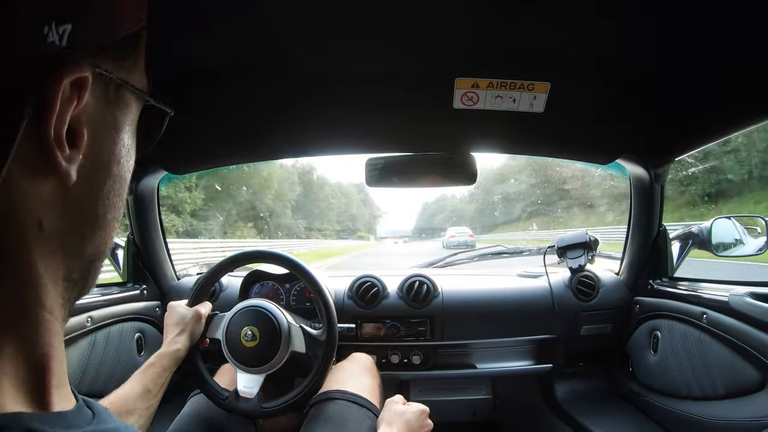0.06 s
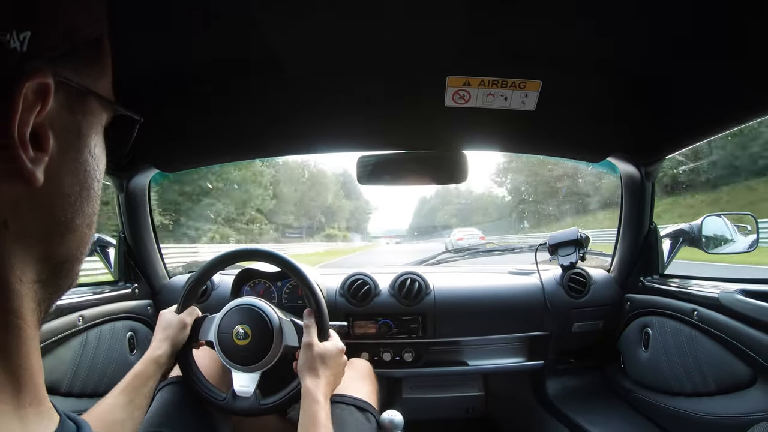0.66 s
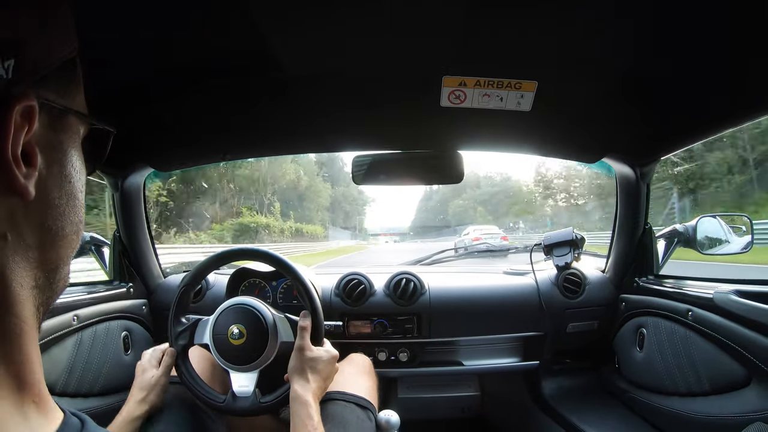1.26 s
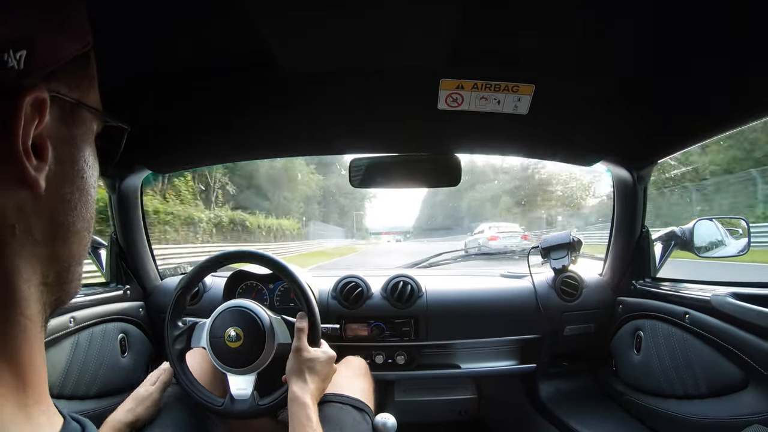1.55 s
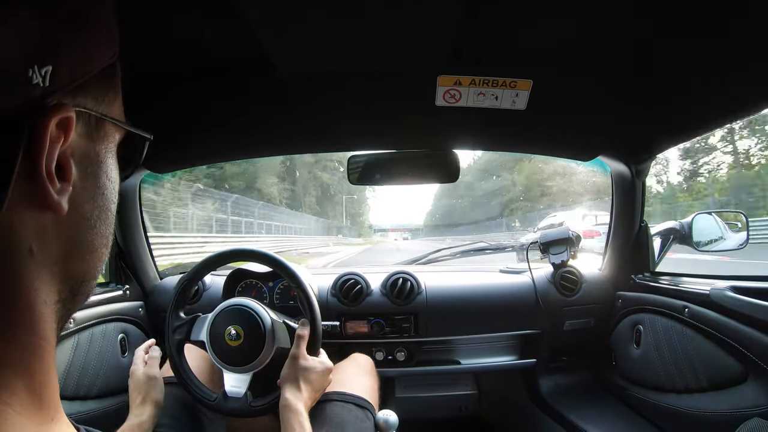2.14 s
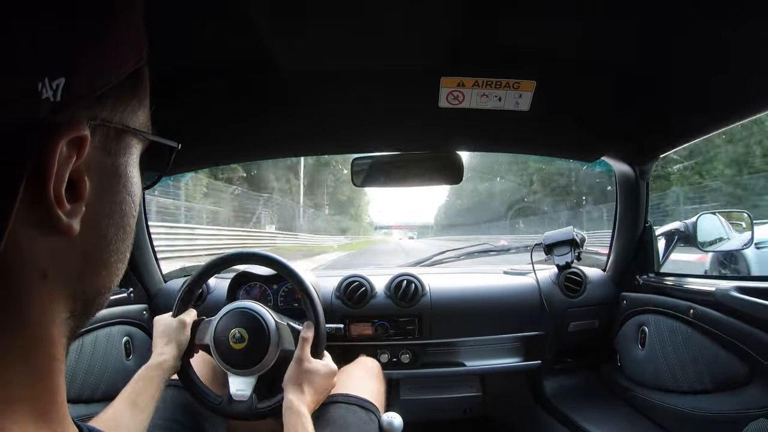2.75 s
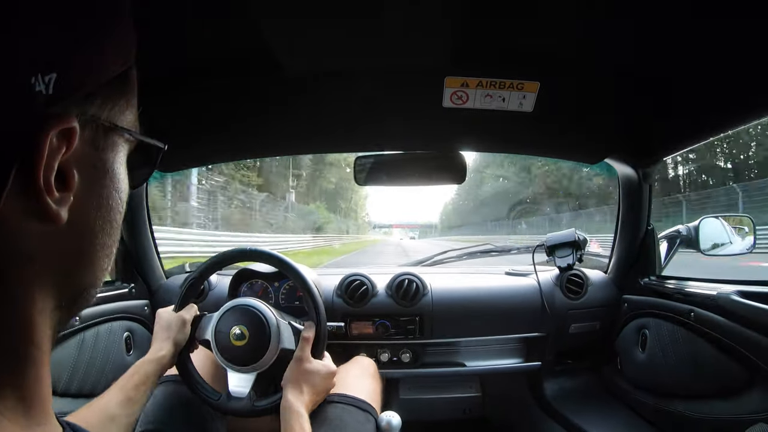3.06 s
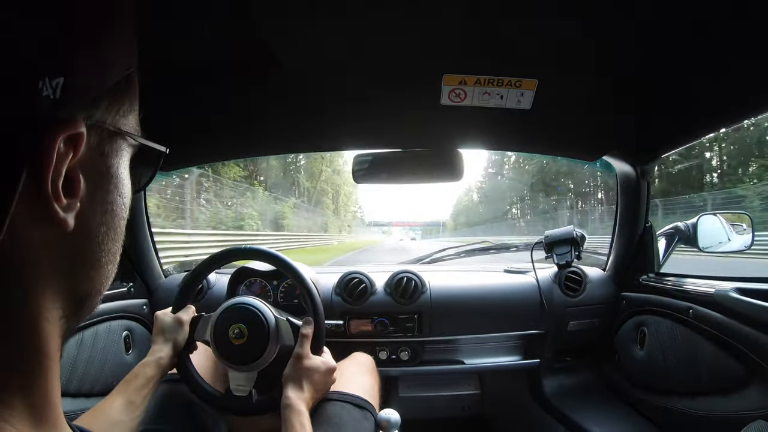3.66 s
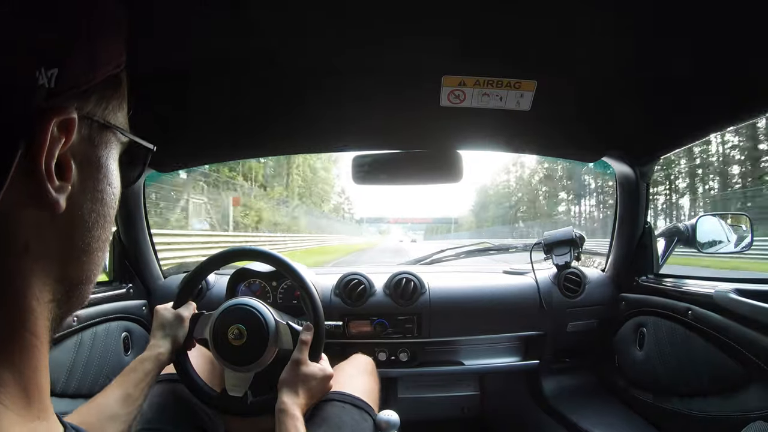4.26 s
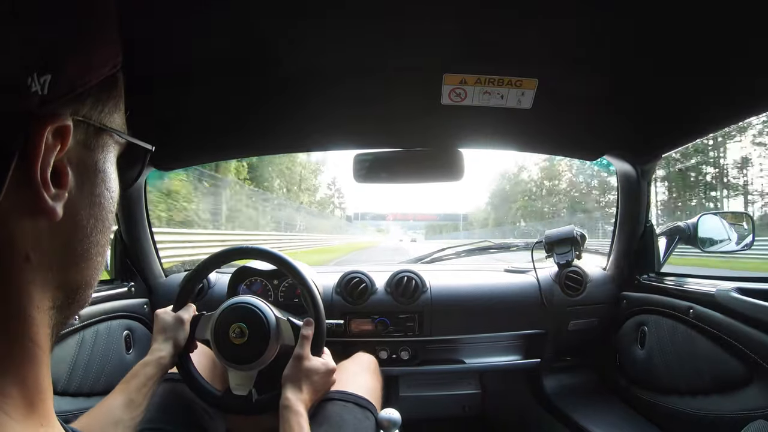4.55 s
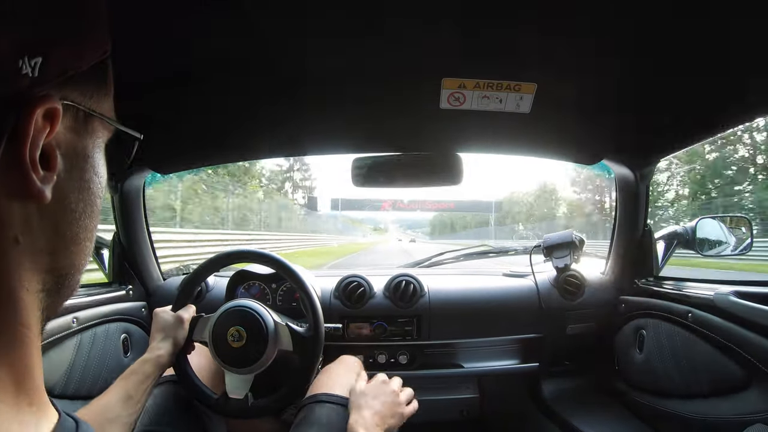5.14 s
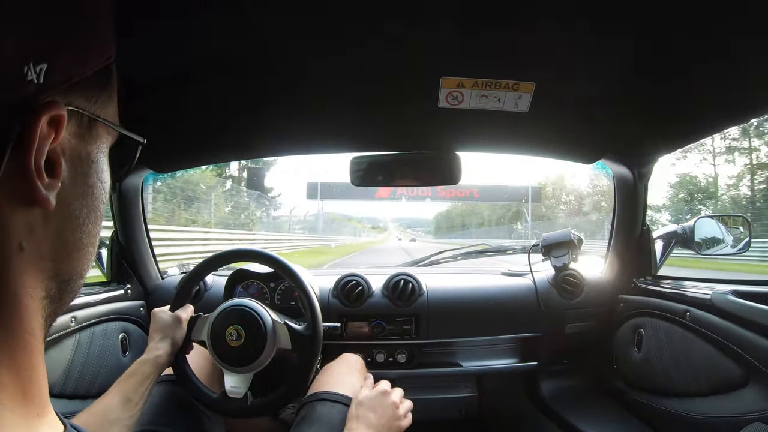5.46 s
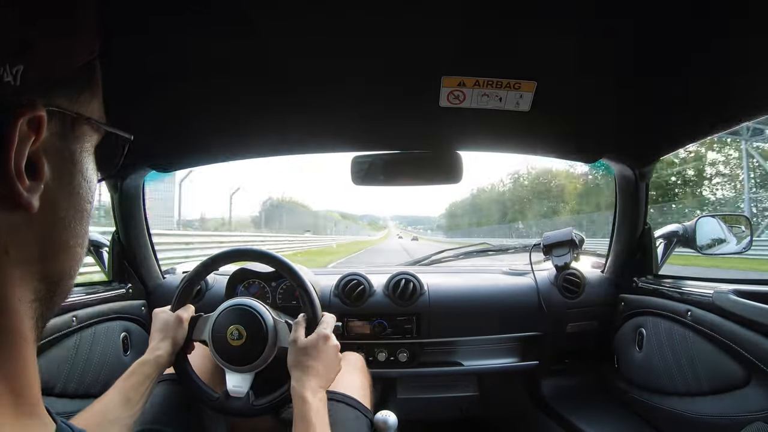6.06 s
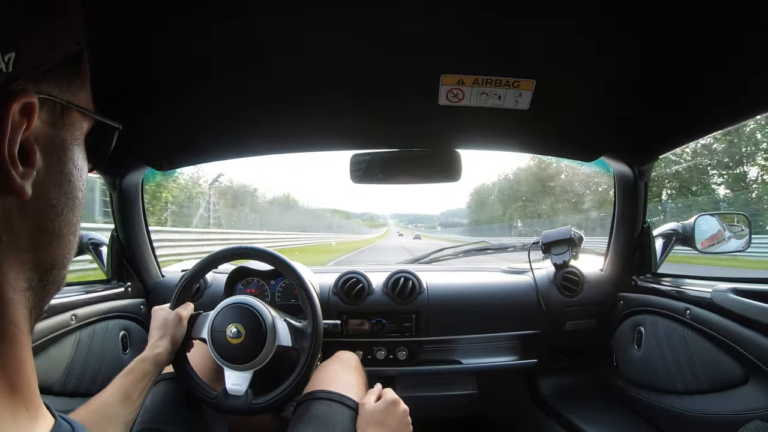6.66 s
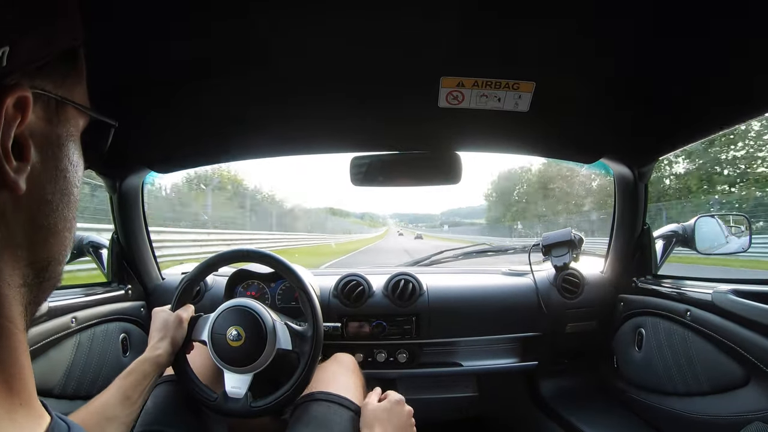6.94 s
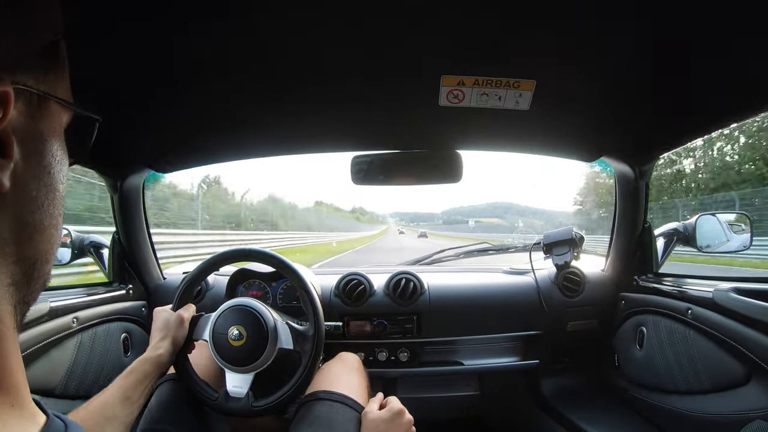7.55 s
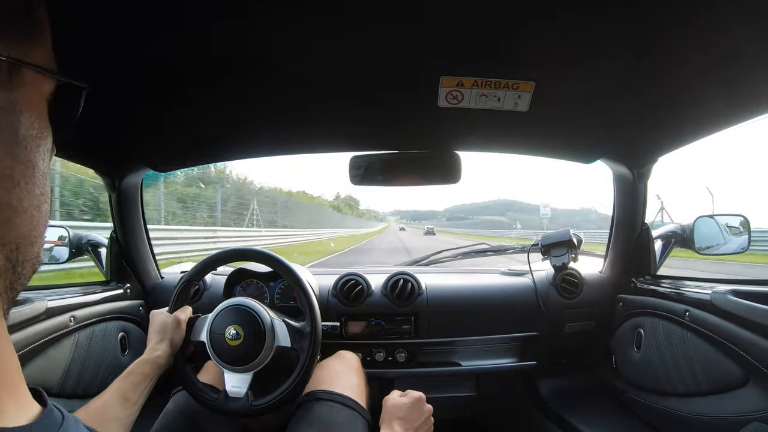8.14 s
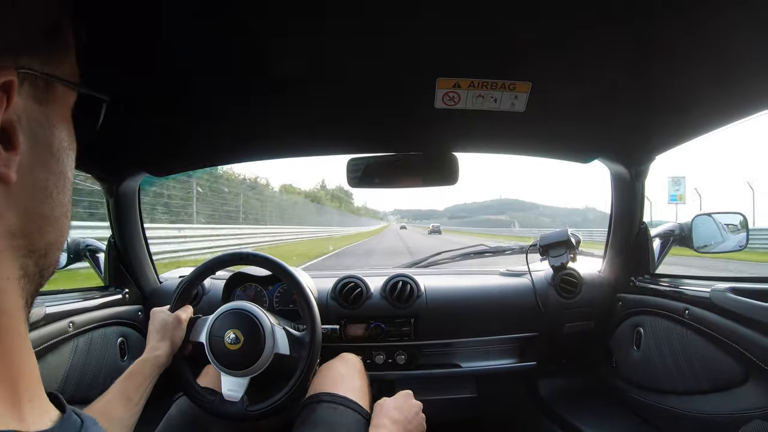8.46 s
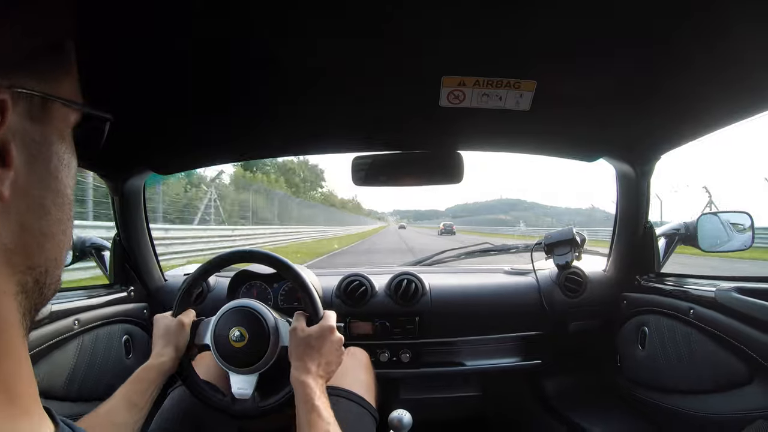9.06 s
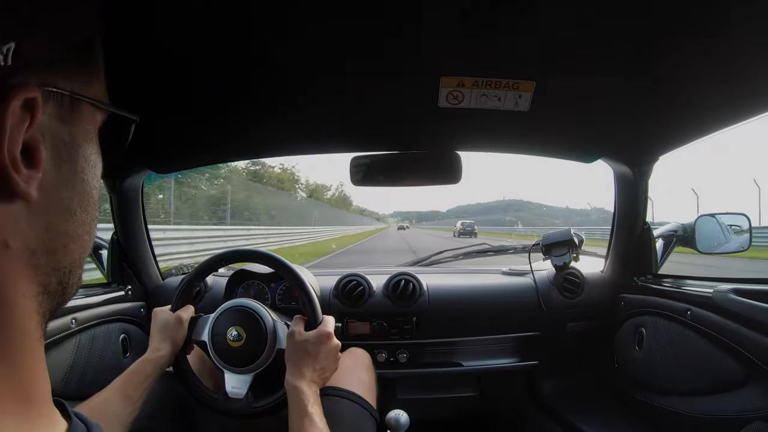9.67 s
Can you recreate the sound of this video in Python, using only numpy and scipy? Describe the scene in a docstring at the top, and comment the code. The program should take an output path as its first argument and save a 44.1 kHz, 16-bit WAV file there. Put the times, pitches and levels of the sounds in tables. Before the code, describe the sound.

Inside a fast car, an upshift leads into a long, droning acceleration and a lift off the throttle, with road rumble and wind hiss.

```python
"""A six-cylinder sports car at speed on a race track, heard from inside its small, bare cabin.
First comes a shift up a gear, with a short blare and a rush of air. The engine note drops into a boom,
then climbs for about seven seconds. Near the end the driver lifts off the throttle and the gears sing
softly. All along, wind hisses on the glass, tyres roar and the body rumbles, with a thud at each bump.
A limiter holds down the loudest bass peaks."""
import sys
import numpy as np
from scipy import signal
from scipy.fft import rfft, irfft, next_fast_len
from scipy.io import wavfile
from scipy.ndimage import uniform_filter1d, minimum_filter1d

SR = 44100
rng = np.random.default_rng(int(sys.argv[2]) if len(sys.argv) > 2 else 0)


def generate_wav(sig):
    """Save sig (samples, or channels by samples) to the path in sys.argv[1] as 16-bit PCM at SR."""
    pcm = np.round(np.clip(np.atleast_2d(sig).T, -1, 1) * 32767).astype(np.int16)
    wavfile.write(sys.argv[1], SR, pcm)


N = 432621
TIME = np.arange(N) / SR
CYLINDERS = 6  # each fires once per engine cycle; a "multiple" is a tone at so many times the cycle rate
LIFT_S = 7.82  # when the foot comes off the throttle

# wind on the glass and seals: (frequency [Hz], relative level [dB])
WIND_SPECTRUM = [(500, -4), (1100, -1), (1280, -0.5), (1550, 2.5), (1720, -5), (2050, -4), (2600, -9.5),
                 (3300, -10.5), (4200, -19), (5200, -23.5), (5900, -31.5), (8200, -36), (8700, -50),
                 (9600, -40.5), (15000, -56)]
# how loud the wind is: (time [s], level [dB])
WIND_LEVEL = [(0, -31), (.3, -43), (1.5, -41.5), (2.5, -41), (4, -37), (5.5, -37), (7.7, -36.5), (8.1, -37),
              (9, -39.5), (9.4, -39), (9.81, -44)]
# roar of the tyres: (frequency [Hz], relative level [dB])
TYRE_SPECTRUM = [(120, -5.5), (165, 0.5), (220, 0.5), (280, -1.5), (320, -5.5), (375, -2.5), (470, -11),
                 (660, -13.5), (800, -19.5), (1140, -20), (1270, -39)]
# how loud the tyres are: (time [s], level [dB])
TYRE_LEVEL = [(0, -17), (.22, -14.5), (.3, -21), (1.2, -22.5), (2, -21), (3.1, -21.5), (3.8, -19.5),
              (4.5, -18), (5.3, -18), (6, -19), (7, -19), (7.7, -18), (8.5, -18.5), (9.3, -18),
              (9.81, -21.5)]
# shaking of the car's body: (frequency [Hz], relative level [dB])
RUMBLE_SPECTRUM = [(12, -11.5), (28, 0.5), (50, -0.5), (72, -2.5), (110, 0.5), (135, -3)]
# how loud that shaking is: (time [s], level [dB])
RUMBLE_LEVEL = [(0, -12.5), (.5, -16), (1.3, -15.5), (2, -16.5), (3.7, -17), (4.9, -15.5), (5.9, -18.5),
                (7.2, -17), (8.3, -18.5), (9.1, -17.5), (9.81, -22)]
# low drone of the cabin air: (time [s], level [dB])
DRONE_LEVEL = [(0, -18.5), (.5, -19.5), (1.3, -20), (2, -20), (3.3, -25), (4.1, -21.5), (4.7, -24),
               (5.8, -18.5), (6.8, -20.5), (7.4, -22), (8, -21.5), (8.7, -24), (9.81, -22.5)]
# bumps in the track: (time of peak [s], relative level [dB], length [s])
BUMPS = [(0.252, -7.5, 0.18), (2.756, -8.5, 0.11), (3.078, -8, 0.13), (4.251, -10.5, 0.09),
         (6.844, -17, 0.21), (7.324, -13, 0.25), (7.625, -10, 0.1), (9.15, -12, .15)]
# gear tones off the throttle: (multiple, level [dB])
GEAR_TONES = [(17.7, -46), (20.7, -48), (26, -54)]
# resonances that let the thin whine through: (frequency [Hz], width [Hz], peak level [dB])
WHINE_RESONANCES = [(9550, 650, -87.5), (10150, 400, -91), (11000, 200, -80.5)]
# hiss of the intake and valves: (frequency [Hz], relative level [dB])
HISS_SPECTRUM = [(1400, 0.5), (2400, 5.5), (3500, -7.5), (5200, -11), (5900, -26), (8200, -27.5),
                 (8700, -37), (12000, -32)]
# air let out as the throttle shuts for the shift: (frequency [Hz], relative level [dB])
SHIFT_AIR_SPECTRUM = [(250, -14), (650, -1.5), (1000, -9), (1550, -5), (1900, -9), (2450, -7),
                      (3000, -12.5), (3700, -19), (5000, -24.5), (6200, -32), (8100, -37), (8700, -48),
                      (15000, -57)]
# how loud that air is: (time [s], level [dB])
SHIFT_AIR_LEVEL = [(0, -41), (.04, -38.5), (.09, -42), (.16, -37), (.2, -41.5), (.25, -41), (.275, -62),
                   (.4, -90)]
# exhaust tones while the clutch is down: (multiple, level [dB])
BLARE_TONES = [(10, -30.5), (12, -26.5)]
# the firing tone during the shift: (time [s], level [dB])
BLARE_FIRING_LEVEL = [(0, -18.5), (.08, -17), (.11, -30), (.21, -29), (.24, -23), (.27, -45), (.4, -90)]
# engine speed until the clutch bites: (time [s], cycle rate [Hz])
SHIFT_SPEED = [(0, 59.6), (.07, 61), (.21, 58), (.25, 49.5), (.32, 45.2), (.4, 46.31)]
# how loud the engine's rasp, hiss and weak tones are: (time [s], relative level [dB])
ENGINE_NOISE_LEVEL = [(0, -8), (.22, 2), (.29, -5.5), (.38, -4), (1.35, -4.5), (2.4, 0.5), (3.2, -1),
                      (4.3, 0.5), (5, 0), (7.8, 1), (7.93, -3.5), (8.6, -4.5), (9.81, -6.5)]
# engine cover and wall behind the seats: (frequency [Hz], width [Hz], relative level [dB])
PANEL_RESONANCES = [(578, 180, -0.5), (931, 100, 1.5), (1059, 65, 0.5), (1153, 20, 5), (1433, 110, 0),
                    (1560, 74, 1), (1908, 97, -2.5), (2050, 270, -7), (2900, 380, -21)]
# the engine's weaker tones: (multiple, relative level [dB])
WEAK_TONES = [(3, -31), (4, -31.5), (7, -40), (14, -51.5), (22, -51), (27, -56), (38, -61.5), (47, -61)]
# exhaust and body resonances, one multiple each: (multiple, frequency [Hz], width [Hz], peak level [dB])
EXHAUST_RESONANCES = [(4, 195, 20, -26.5), (4, 228, 30, -31.5), (5, 269.5, 8, -21), (5, 277, 7, -27),
                      (5, 290, 16, -33), (8, 392, 24, -33.5), (8, 474, 14, -38), (9, 476, 26, -32.5),
                      (9, 506, 18, -32.5), (9, 526, 10, -38), (10, 540, 16, -38.5), (10, 566, 12, -38),
                      (11, 580, 22, -37), (11, 612, 22, -36.5), (12, 545, 12, -30), (12, 590, 10, -32),
                      (12, 601, 18, -33.5), (12, 622, 16, -41), (12, 648, 14, -37.5), (12, 678, 20, -39),
                      (12, 713, 12, -36.5), (13, 685, 60, -45), (15, 715, 18, -43), (15, 753, 18, -43),
                      (16, 820, 22, -46.5), (16, 905, 30, -46), (16, 953, 18, -42.5), (17, 927, 22, -41.5),
                      (17, 960, 14, -45.5), (17, 1016, 8, -42), (18, 882, 44, -42.5), (18, 898, 16, -37.5),
                      (18, 962, 32, -45.5), (18, 1013, 18, -41.5), (18, 1073, 12, -44),
                      (19, 1015, 16, -45.5), (19, 1052, 18, -41), (20, 962, 20, -43), (20, 1040, 60, -43.5),
                      (20, 1112, 14, -41), (21, 1020, 70, -47.5), (21, 1125, 30, -45),
                      (21, 1150, 22, -39.3), (21, 1204, 10, -43.5), (24, 1154, 12, -44),
                      (24, 1418, 40, -45), (25, 1385, 50, -51), (25, 1485, 30, -51), (26, 1395, 18, -44),
                      (26, 1458, 22, -46), (30, 1510, 26, -48), (30, 1610, 120, -53),
                      (31.5, 1890, 16, -40.5), (33, 1862, 16, -49), (33, 1926, 22, -45.5),
                      (34, 1610, 30, -50), (34, 1950, 24, -50), (36, 1930, 48, -48), (36, 2066, 26, -43.3),
                      (36, 2112, 30, -52), (39, 2205, 40, -51), (40, 1885, 20, -52),
                      (41.6, 2210, 130, -53.5), (48, 2585, 50, -57), (48, 2720, 260, -62)]
# pitches at which the cabin air booms: (frequency [Hz], width [Hz], peak level [dB])
CABIN_RESONANCES = [(282, 30, -9.8), (304, 12, -22), (318.5, 5, -23), (349.5, 12, -20.5), (357, 5, -25)]


def amp(db):
    """Turns decibels into a gain to multiply by."""
    return 10 ** (np.asarray(db) / 20)


def unit_level(x):
    """Scales a signal so that its average power is 1."""
    return x / np.sqrt(np.mean(x ** 2) + 1e-20)


def curve(table):
    """Joins the points of a (time, value) table with straight lines."""
    return np.interp(TIME, *np.transpose(table))


def shaped_noise(spectrum):
    """Noise of power 1 that follows a spectrum table and fades beyond its ends."""
    size = next_fast_len(N)
    freqs = np.fft.rfftfreq(size, 1 / SR) + 0.09  # the offset avoids log(0)
    hz, db = np.transpose(spectrum)
    ends = np.minimum(freqs / hz[0], 1) ** 2 * np.minimum(hz[-1] / freqs, 1) ** 4
    gain = ends * amp(np.interp(np.log(freqs), np.log(hz), db))
    return unit_level(irfft(rfft(rng.standard_normal(N), size) * gain, size)[:N])


def wander(rate_hz, size=4096):
    """A random wobble of typical size 1, moving up to about the given rate."""
    freqs = np.fft.rfftfreq(size, N / SR / size)
    gain = (freqs > 0) / (1 + (freqs / rate_hz) ** 2)
    wobble = irfft(rfft(rng.standard_normal(size)) * gain)
    return np.interp(TIME, np.linspace(0, N / SR, size), unit_level(wobble))


def steadied(noise, share=.4, window_s=.045):
    """Smooths away a share of a noise's random swells, so that it sounds dense."""
    power = abs(uniform_filter1d(noise ** 2, round(window_s * SR))) + 1e-12
    return unit_level(noise / np.sqrt(power) ** share)


def ring(x, hz, width_hz):
    """A resonance: lets through only the sound near one pitch."""
    b, a = signal.iirpeak(hz, hz / (1.5 * width_hz), SR)
    return signal.lfilter(b, a, signal.lfilter(b, a, x))


def resonance_gain(hz, resonances):
    """How strong a tone gets as its pitch glides through flat-topped resonances."""
    powers = (amp(db) ** 2 / (1 + (2 * (hz - centre) / width) ** 4) for centre, width, db in resonances)
    return np.sqrt(sum(powers))


def uneven_tone(angle, multiple):
    """One engine tone; no two firings are alike, so its strength and timing shake."""
    strength = unit_level(amp(1.6 * wander(22) + 1.1 * wander(5)))
    phase = multiple * angle + 2 * np.pi * rng.random()
    return strength * np.sin(phase + .3 * wander(18))


def wind(gust_db=.2, flutter_db=1.04):
    """Air tears along the windows, with slow gusts and a quick flutter."""
    level_db = curve(WIND_LEVEL) + gust_db * wander(2)
    return shaped_noise(WIND_SPECTRUM) * amp(level_db + flutter_db * wander(25))


def tyre_roar():
    """The rolling tyres send a dense roar through the body."""
    return steadied(shaped_noise(TYRE_SPECTRUM)) * amp(curve(TYRE_LEVEL))


def body_rumble(drone_hz=110, drone_width_hz=28):
    """The shaking body rumbles and keeps the cabin air droning on one low note."""
    drone = steadied(ring(rng.standard_normal(N), drone_hz, drone_width_hz))
    shaking = steadied(shaped_noise(RUMBLE_SPECTRUM))
    return amp(curve(RUMBLE_LEVEL)) * shaking + amp(curve(DRONE_LEVEL)) * drone


def bumps(body_hz=32, gain_db=-5):
    """Each bump makes the body shudder a few times, never at quite the same pitch."""
    out = np.zeros(N)
    for peak_s, db, length_s in BUMPS:
        near = abs(TIME - peak_s) < 2 * length_s
        t = TIME[near] - peak_s
        hz = body_hz * 2 ** rng.uniform(-.25, .25)
        shudder = np.sin(2 * np.pi * (hz * t + rng.random()))
        swell = np.exp(-(2 * t / length_s) ** 2)
        out[near] += amp(gain_db + db) * swell * shudder
    return out


def engine_speed(pull_hz_per_s=2.3035, drag_hz_per_s2=.1208, coast_hz_per_s=1.07):
    """Engine cycles per second: a drop at the shift, a climb slowed by drag, then coasting down."""
    in_gear_s = SHIFT_SPEED[-1][0]
    pulling_s = np.clip(TIME, in_gear_s, LIFT_S) - in_gear_s
    coasting_s = np.maximum(TIME - LIFT_S, 0)
    climb_hz = pull_hz_per_s * pulling_s - drag_hz_per_s2 * pulling_s ** 2 / 2
    return curve(SHIFT_SPEED) + climb_hz - coast_hz_per_s * coasting_s


def cycle_angle(speed, tremble=.0009):
    """How far the engine has run, at 2 pi per cycle; its speed trembles slightly."""
    return 2 * np.pi * np.cumsum(speed * (1 + tremble * wander(12))) / SR


def throttle(open_at_s=.28, travel_s=.079, shut_db=-12.5, coast_db_per_s=-6):
    """Gain of the engine's tones: low for the shift, full in gear, dropping and fading after the lift."""
    coasting_s = np.maximum(TIME - LIFT_S, 0)
    shut_for_shift = np.clip((open_at_s - TIME) / travel_s, 0, 1)
    shut_for_lift = np.minimum(coasting_s / travel_s, 1)
    return amp(shut_db * (shut_for_shift + shut_for_lift) + coast_db_per_s * coasting_s)


def gear_whine(angle, rise_s=.5):
    """Off the throttle, the gears sing softly on the backs of their teeth."""
    fade_in = np.clip((TIME - LIFT_S) / rise_s, 0, 1)
    return np.sqrt(2) * fade_in * sum(amp(db) * uneven_tone(angle, k) for k, db in GEAR_TONES)


def thin_whine(angle, speed, multiple=184):
    """A thin, fuzzy whine, likely the supercharger, climbs with the revs and fades at the lift."""
    fuzz = 2.6 * wander(50)
    gain = resonance_gain(multiple * speed, WHINE_RESONANCES) * throttle()
    return np.sqrt(2) * gain * np.sin(multiple * angle + fuzz)


def intake_hiss(angle, noise_gain, level_db=-46):
    """Intake air and valves hiss in time with the firings."""
    pulsing = 1 + .25 * np.cos(CYLINDERS * angle)
    return amp(level_db) * noise_gain * shaped_noise(HISS_SPECTRUM) * pulsing


def shift_air(angle, flutter_db=1.2):
    """A rush of air from the intake, chopped by the cylinders, dies as the shift ends."""
    level_db = curve(SHIFT_AIR_LEVEL) + flutter_db * wander(40)
    chop = unit_level(1 + .6 * np.cos(CYLINDERS * angle))
    return shaped_noise(SHIFT_AIR_SPECTRUM) * chop * amp(level_db)


def shift_blare(angle, end_s=.24, fade_s=.043):
    """With the clutch down, the engine blares roughly and its note slides into the next gear."""
    fade = np.clip(np.minimum(TIME, end_s - TIME) / fade_s, 0, 1)
    rough_angle = angle + .06 * wander(45)
    firing = amp(curve(BLARE_FIRING_LEVEL)) * np.sin(CYLINDERS * rough_angle)
    blare = sum(amp(db) * uneven_tone(rough_angle, k) for k, db in BLARE_TONES)
    return np.sqrt(2) * (firing + fade * blare)


def panels(shaking, surge_db=1.8):
    """The panels behind the seats ring when shaken, each swelling and fading on its own."""
    return sum(amp(db + surge_db * wander(7)) * ring(shaking, hz, width)
               for hz, width, db in PANEL_RESONANCES)


def engine_rasp(angle, noise_gain, level_db=-35):
    """Each firing gives a puff of noise that rings the panels."""
    firing = 1 + .7 * np.cos(CYLINDERS * angle)
    banks = 1 + .21 * np.cos(3 * angle)  # the two rows of cylinders are not equally strong
    lope = 1 + .25 * np.cos(angle) + .25 * np.sin(2 * angle)  # unevenness over the cycle
    puffs = rng.standard_normal(N) * firing * banks * lope
    return amp(level_db) * noise_gain * unit_level(panels(puffs))


def weak_tones(angle, noise_gain, drift_db=1.8, panel_db=3):
    """Unequal cylinders leave weak tones between the strong ones; they flare where the panels ring."""
    strong = {CYLINDERS} | {row[0] for row in EXHAUST_RESONANCES}
    multiples, levels_db = np.transpose(WEAK_TONES)
    tones = np.zeros(N)
    for k in range(round(multiples[0]), round(multiples[-1]) + 1):
        if k not in strong:
            level_db = np.interp(k, multiples, levels_db) + drift_db * wander(1.2)
            tones += amp(level_db) * uneven_tone(angle, k)
    return np.sqrt(2 * throttle()) * noise_gain * (tones + amp(panel_db) * panels(tones))


def exhaust_tones(angle, speed, floor_db=-44, floor_db_per_octave=-6):
    """The strong tones swell as the revs carry them through their resonances, and stay faint between."""
    tones = np.zeros(N)
    for k in sorted({row[0] for row in EXHAUST_RESONANCES}):
        resonances = [row[1:] for row in EXHAUST_RESONANCES if row[0] == k]
        swell = resonance_gain(k * speed, resonances)
        floor = amp(floor_db + floor_db_per_octave * np.log2(k / CYLINDERS))
        tones += np.hypot(swell, floor) * uneven_tone(angle, k)
    return np.sqrt(2) * throttle() * tones


def cabin_boom(angle, speed, waver_db=.37):
    """The firing tone, one pulse per cylinder, booms as it passes the resonances of the cabin air."""
    gain = resonance_gain(CYLINDERS * speed, CABIN_RESONANCES) * throttle()
    waver = amp(-waver_db * wander(12))
    sway = .07 * wander(15)
    return np.sqrt(2) * gain * waver * np.sin(CYLINDERS * angle + sway)


def scene():
    """Engine, tyres, body and wind add up at one spot behind the seats."""
    speed, noise_gain = engine_speed(), amp(curve(ENGINE_NOISE_LEVEL))
    angle = cycle_angle(speed)
    engine = cabin_boom(angle, speed) + exhaust_tones(angle, speed) + weak_tones(angle, noise_gain)
    engine += gear_whine(angle) + engine_rasp(angle, noise_gain)
    engine += intake_hiss(angle, noise_gain) + thin_whine(angle, speed)
    shift = shift_blare(angle) + shift_air(angle)
    return (engine + shift + tyre_roar() + body_rumble() + wind() + bumps())[None]


def record(dry, ceiling_db=-4, recovery_db_per_s=40, boost_db=2, split_hz=600, top_hz=15700):
    """Boosts the bass, turns it down briefly at its peaks (a limiter), then cuts the highest treble."""
    bass = signal.sosfiltfilt(signal.butter(2, split_hz, fs=SR, output="sos"), dry[0])
    treble = dry[0] - bass
    over_db = np.maximum(20 * np.log10(abs(bass) + 1e-9) + boost_db - ceiling_db, 0)
    recovery_db = TIME * recovery_db_per_s
    gain_db = recovery_db - np.maximum.accumulate(over_db + recovery_db)  # drops fast, comes back slowly
    smooth_db = uniform_filter1d(minimum_filter1d(gain_db, size=200), size=200)
    lowpass = signal.firwin(511, top_hz, window=("kaiser", 9), fs=SR)
    return signal.oaconvolve(treble + bass * amp(boost_db + smooth_db), lowpass, "same")[None]


dry = scene()
out = record(dry)
generate_wav(out)
```